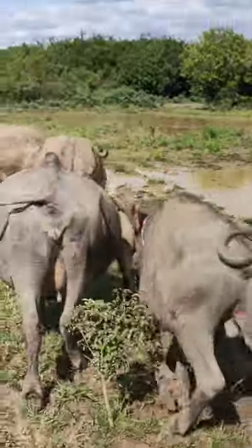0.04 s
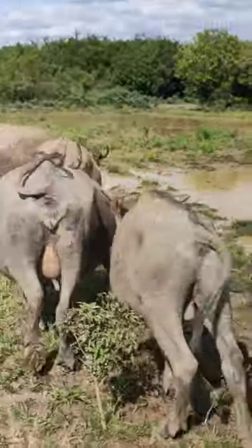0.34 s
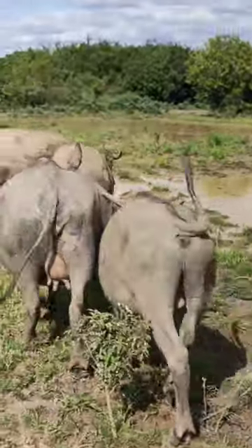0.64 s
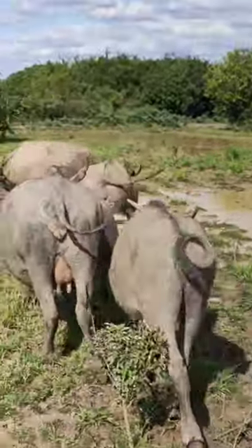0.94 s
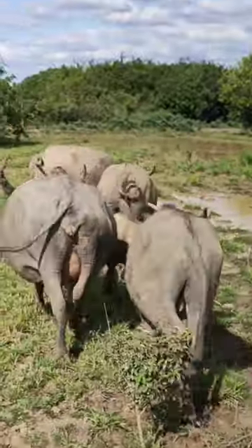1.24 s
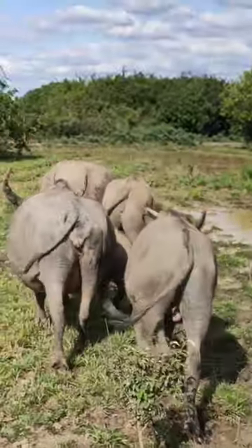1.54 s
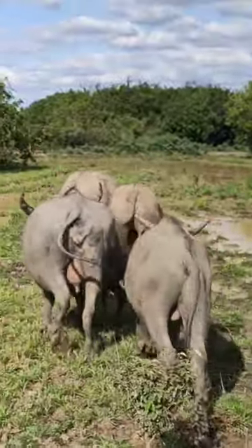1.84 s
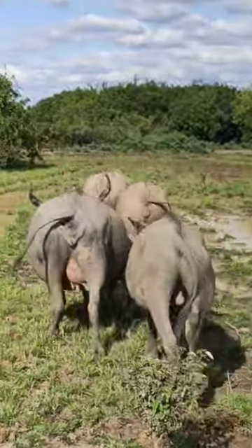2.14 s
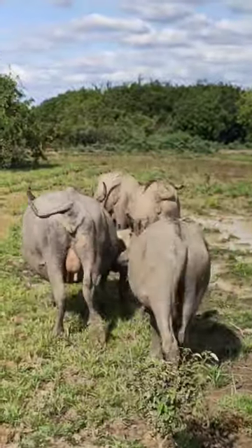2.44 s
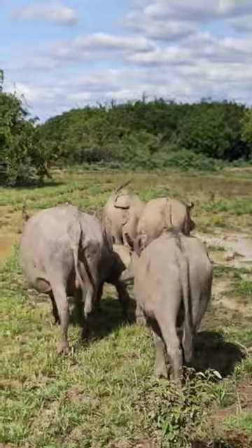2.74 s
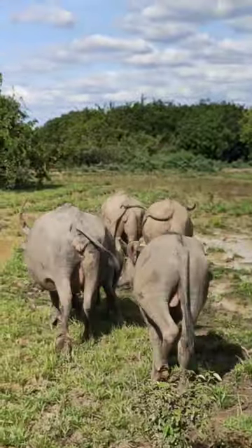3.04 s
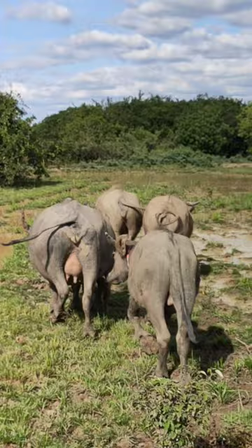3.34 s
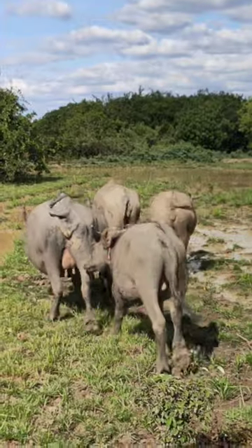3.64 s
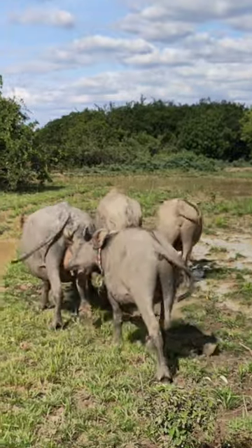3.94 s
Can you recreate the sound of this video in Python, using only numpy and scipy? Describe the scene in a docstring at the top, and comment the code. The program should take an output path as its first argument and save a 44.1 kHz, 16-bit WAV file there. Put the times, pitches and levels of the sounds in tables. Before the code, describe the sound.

Water buffalo walk away over wet grass, their hooves squelching and thudding softly. A twig cracks close on the right, then stalks snap and grass rustles. Light wind rumbles on the microphone, gusting near the end, over faint wetland hiss.

```python
"""Hooves squelch in mud and a dry twig cracks, close by on the right: a few water buffalo are walking
away over wet grass, snapping stalks and brushing the tufts with their legs.
A light wind rumbles on the two microphone ports and gusts near the end; the right port rings in the
treble and, faintly, near 970 Hz. Behind lie the soft hiss of the open wetland and one thin bird chirp."""
import sys
import numpy as np
from scipy import signal
from scipy.io import wavfile
from scipy.ndimage import uniform_filter1d

SR = 44100
rng = np.random.default_rng(int(sys.argv[2]) if len(sys.argv) > 2 else 0)


def unload_wav(signal):
    """Save mono or channel-first audio to the path in sys.argv[1] as 16-bit WAV at rate SR, clipped to [-1, 1]."""
    wavfile.write(
        sys.argv[1],
        SR,
        np.round(np.clip(np.atleast_2d(signal).T, -1, 1) * 32767).astype(np.int16),
    )


N = 176400
TIME = np.arange(N) / SR


def hooves():
    """Tiny wet pops in the hollow under each hoof, dull thuds on turf, and the herd's patter beyond."""
    # Hooves press into and pull out of mud. Each row: peak in seconds, level in dB, fade in seconds,
    # pitch in Hz.
    squelches = [(0.018, -66, 0.072, 1090), (0.03, -70, 0.044, 1800), (0.182, -62, 0.0098, 1950),
                 (0.204, -52, 0.013, 1420), (0.259, -60.5, 0.013, 1450), (0.323, -59.5, 0.0065, 1800),
                 (0.645, -63, 0.028, 1270), (0.838, -62, 0.018, 1030), (0.892, -57, 0.018, 1080),
                 (0.899, -49.5, 0.0069, 1800), (1.603, -57, 0.0064, 1440), (1.81, -68.5, 0.08, 1440),
                 (1.964, -61.5, 0.012, 1360), (2.325, -60, 0.0078, 1380), (2.571, -61, 0.0042, 1720),
                 (2.91, -62.5, 0.0063, 2670), (2.927, -72, 0.0082, 1950), (3.013, -64, 0.0078, 1880),
                 (3.295, -53, 0.0024, 1320), (3.316, -53.5, 0.0082, 1760), (3.469, -56, 0.005, 1300),
                 (3.547, -53.5, 0.0092, 1150), (3.63, -49.5, 0.0036, 2200), (3.745, -62, 0.018, 1770),
                 (3.906, -59.5, 0.011, 1950)]
    # Weight lands on turf. Each row: peak in seconds, level in dB, fade in seconds, pitch in Hz.
    thuds = [(0.012, -60, 0.04, 636), (0.332, -57.5, 0.0052, 483), (0.703, -63, 0.014, 710),
             (0.765, -64.5, 0.053, 650), (0.818, -51.5, 0.0094, 445), (0.836, -58, 0.016, 700),
             (0.905, -64, 0.019, 580), (1.219, -62.5, .006, 400), (3.596, -56, 0.021, 560),
             (3.635, -51.5, 0.0054, 1150), (3.623, -48.5, 0.0095, 209)]
    # Hollows under the farther hooves. Each entry: pitch in Hz.
    herd_hollows = [778, 1150, 1490, 1950]
    herd_db, herd_swing_db, hollow_ratio = -85.5, 5.5, 1.35
    pops = grains(1100, spread_db=3, alike=0.65)
    spray = from_db(-3) * rms_one(band(pops, 600, 3200))
    out = np.zeros((2, N))
    for hz in herd_hollows:
        patter = rms_one(band(pops, hz / 1.154, hz * 1.08))
        out += from_db(herd_db + herd_swing_db * drift(7.9)) * patter
    for s, db, fade, hz in squelches:
        near = around(s)
        hollow = rms_one(band(pops[:, near], hz / hollow_ratio, hz * hollow_ratio))
        out[:, near] += from_db(db) * burst(hollow + spray[:, near], swell(s, fade, near))
    for s, db, fade, hz in thuds:
        near = around(s)
        turf = band(pops[:, near], hz / 2.16, hz * 1.78)
        out[:, near] += from_db(db) * burst(turf, swell(s, fade, near))
    return out * pan(-4)


def twig():
    """A dry twig breaks underfoot, hard right, in two clean, full-bodied clicks."""
    # The wood gives way. Each row: start in seconds, level in dB before filtering.
    cracks = [(0.1523, -16), (0.1563, -21)]
    low_hz, high_hz = 260, 5900
    clicks = np.zeros(N)
    for s, db in cracks:
        clicks[int(s * SR)] = from_db(db)
    wood = band(clicks, low_hz, high_hz)
    return band(wood, low_hz / 2, high_hz) * pan(-32)


def stalks():
    """Each snap is a sharp crack followed by a dying tear of fibres; thicker stalks reach lower."""
    # Stalks break; the low-edged row near 0.82 s is a wet crackle in the mud. Each row: start in seconds, level
    # in dB before filtering, decay in seconds, # low edge in Hz, left over right in dB.
    snaps = [(0.021, -51, 0.0035, 2000, -11), (0.174, -53, 0.0032, 2000, -15),
             (0.326, -57, 0.0065, 2500, -15), (0.819, -50, 0.0028, 600, -11),
             (0.852, -50, 0.0026, 3500, -18), (0.8968, -41.5, .003, 1290, -21),
             (0.903, -45.5, 0.0065, 4000, -28), (0.908, -47, 0.002, 1500, -21),
             (1.2639, -40.5, 0.0058, 2420, -11), (1.549, -45.5, 0.0076, 4720, -20),
             (1.563, -48, 0.0071, 4630, -19), (1.585, -49.5, 0.005, 4330, -18),
             (1.933, -44.5, 0.0047, 3500, -20), (2.325, -50, 0.0046, 1200, -6),
             (2.569, -47.5, 0.0062, 2000, -7), (2.784, -49, 0.0018, 3000, -14),
             (2.893, -44.5, 0.0065, 2800, -19), (2.959, -51.5, 0.0023, 3000, -16),
             (3.317, -44.5, 0.0067, 1700, -14), (3.628, -40.5, 0.0015, 1300, -4),
             (3.65, -47, 0.0023, 4000, -14), (3.6652, -39.5, 0.0018, 4830, -22),
             (3.75, -49.5, 0.004, 3500, -14)]
    high_hz, crack_strength, sizzle_db = 6700, 1.3, -24
    lowpass = signal.butter(6, high_hz, fs=SR, output="sos")
    fibres = grains(9200, spread_db=5.5, alike=1.0)
    age = np.arange(SR // 10) / SR
    out = np.zeros((2, N))
    for s, db, decay, low_hz, side_db in snaps:
        near = slice(int(s * SR), int(s * SR) + len(age))
        tear = burst(fibres[:, near], np.exp(-np.minimum(age / decay, 40)))
        snap = tear + crack_strength * (age == 0)
        body = signal.sosfilt(lowpass, band(snap, low_hz, 2 * high_hz))
        out[:, near] += from_db(db) * pan(side_db) * (body + from_db(sizzle_db) * snap)
    return out


def grass():
    """Blades flick past the legs on the right: fine bright grains in swishes over a light rustle."""
    # Legs brush tufts. Each row: peak in seconds, level in dB, fade in seconds, tilt in dB per octave.
    swishes = [(0.063, -58.5, 0.012, -4.5), (0.331, -57.5, 0.013, -2.5), (0.595, -58, 0.015, -1),
               (0.666, -64, 0.068, 2), (0.854, -63, 0.077, -5), (1.039, -62, 0.021, -1),
               (1.172, -60, 0.0076, -6), (1.282, -67, 0.084, 5), (1.566, -61.5, 0.032, 10),
               (1.855, -62, 0.039, 3), (1.98, -65.5, 0.15, 3.5), (2.395, -59.5, 0.024, -1.5),
               (2.483, -61, 0.028, -5), (2.596, -58.5, 0.015, -2.5), (2.884, -70, 0.077, 11),
               (3.215, -67.5, 0.066, 4.5), (3.311, -62, 0.025, -1), (3.534, -58.5, 0.023, -6.5),
               (3.634, -63, 0.047, -0.5), (3.689, -59, 0.021, -5.5), (3.889, -60.5, 0.0046, -6.5)]
    # The colour of the blades. Each row: frequency in Hz, relative spectral density in dB.
    spectrum = [(1500, -4), (3000, -7), (5000, 2.5), (6300, -5.5), (8000, -3), (11000, -14.5), (14000, 5.5),
                (16000, -20.5)]
    rustle_db, rustle_swing_db = -73, 2
    flicks = [grains(2400, spread_db=2.5, alike=.3) for _ in range(2)]
    edges = np.geomspace(1400, 17000, 11)
    hz = np.sqrt(edges[1:] * edges[:-1])
    colour = from_db(at_hz(spectrum, hz)) ** 2 * np.diff(edges)
    rustle = from_db(rustle_db + rustle_swing_db * drift(2.4))
    power = np.outer(colour / colour.sum(), rustle ** 2)
    for s, db, fade, tilt_db in swishes:
        near = around(s)
        tilted = colour * from_db(tilt_db * np.log2(hz)) ** 2
        swish = from_db(db) * swell(s, fade, near)
        power[:, near] += np.outer(tilted / tilted.sum(), swish ** 2)
    out = np.zeros((2, N))
    for k, band_power in enumerate(power):
        out += np.sqrt(band_power) * rms_one(band(flicks[k % 2], edges[k], edges[k + 1]))
    return out * pan(-21.5)


def wind():
    """A light wind reaches the two microphone ports, each with its own gusts."""
    # Rumble on the left and on the right port. Each row: time in seconds, level in dB.
    left_gusts = [(0, -49.5), (0.38, -41), (0.6, -46), (0.85, -47), (1.05, -41.5), (1.33, -50.5),
                  (1.72, -49), (1.92, -43), (2.32, -45), (2.5, -36), (2.75, -37), (2.85, -33), (2.97, -37),
                  (3.15, -33.5), (3.35, -29.5), (3.5, -39), (3.8, -46), (4.0, -45)]
    right_gusts = [(0.08, -59), (0.68, -55), (0.8, -52), (1.0, -56.5), (1.7, -55), (1.83, -46), (2.0, -55),
                   (2.15, -40.5), (2.48, -39.5), (2.63, -57), (2.75, -62), (2.88, -48), (3.0, -48),
                   (3.3, -29), (3.44, -39), (3.6, -44), (3.72, -52), (3.87, -44), (4.0, -57)]
    return np.array([wind_on_port(left_gusts), wind_on_port(right_gusts)])


def wind_on_port(gusts):
    """Lumpy turbulence on one port, growing brighter as a gust rises above the breeze."""
    # Rumble in a light breeze. Each row: frequency in Hz, relative spectral density in dB.
    spectrum = [(22, -2), (40, 2), (60, 6), (85, 7.5), (120, -7.5), (160, -13), (250, -39), (320, -50),
                (450, -63), (800, -56.5)]
    breeze_db, flutter_db, lumps_db = -44, 2.4, 3.2
    brightening = .55  # dB per octave for each dB above the breeze
    level_db = in_time(gusts)[0] + flutter_db * drift(20.0)
    tilt_db = brightening * np.maximum(level_db - breeze_db, 0)
    white = rng.standard_normal((2, N))
    edges = 20 * 2 ** np.arange(0, 5.6, .5)
    rumble, power = 0, 0
    for k, (low, high) in enumerate(zip(edges, edges[1:])):
        hz = np.sqrt(low * high)
        octaves = np.clip(np.log2(hz / 70), -1, 2.3)
        gain = from_db(at_hz(spectrum, hz) + tilt_db * octaves + 1.8 * drift(23.0)) * np.sqrt(high - low)
        rumble += gain * rms_one(band(white[k % 2], low, high))
        power += gain ** 2
    lumpy = rumble / np.sqrt(power) * from_db(lumps_db * drift(26.7))
    running_rms = np.sqrt(uniform_filter1d(lumpy ** 2, size=SR // 10) + 1e-6)
    return from_db(level_db) * lumpy / running_rms


def eddies():
    """Single eddies strike the ports: short low buffets on top of the rumble."""
    # Eddies hit. Each row: peak in seconds, level in dB, pitch in Hz, left over right in dB.
    buffets = [(0.01, -32.5, 70.5, -14), (0.213, -31.5, 65, 31), (0.357, -34.5, 97, 29),
               (0.557, -39.5, 151, 24), (1.404, -33.5, 90, -15), (1.57, -37.5, 87, 19),
               (1.957, -38.5, 140, 27), (2.072, -35, 166, 20), (2.227, -35, 153, -15),
               (2.319, -32, 134, -16), (2.456, -38, 146, 13), (2.598, -32, 280, 32), (2.627, -33, 197, 30),
               (2.646, -31.5, 313, 36), (2.661, -36.5, 281, 32), (2.677, -36, 255, 35),
               (2.727, -37.5, 246, 34), (2.807, -32.5, 187, 35), (2.841, -28.5, 200, 20),
               (2.856, -38.5, 242, 30), (2.873, -31, 260, 31), (2.888, -25, 209, 32), (2.893, -34, 250, 31),
               (3.085, -36, 222, 28), (3.131, -33.5, 237, 30), (3.186, -31.5, 218, 18),
               (3.209, -30.5, 185, 7), (3.252, -29, 187, -23), (3.304, -29, 232, -4),
               (3.36, -21.5, 160, 29), (3.381, -26, 382, 40), (3.396, -33, 274, 30)]
    fade_s, below, above = 0.0057, 1.87, 1.013  # the band reaches well below the pitch, barely above
    white = rng.standard_normal((2, N))
    out = np.zeros((2, N))
    for s, db, hz, side_db in buffets:
        near = around(s)
        noise = band(white[:, near], hz / below, hz * above)
        dark = band(noise, hz / below ** 2, hz * above * 1.75)  # steepens the skirts
        envelope = swell(s, fade_s, near)
        out[:, near] += from_db(db) * pan(side_db) * [burst(port, envelope) for port in dark]
    return out


def bird():
    """One thin, slightly rough rising whistle, off to the right."""
    # The chirp's path. Each row: time in seconds, pitch in Hz, level in dB.
    chirp = [(1.2, 3750, -78), (1.255, 5000, -68), (1.305, 5600, -64.5), (1.32, 5900, -69),
             (1.345, 6500, -66), (1.365, 6750, -80)]
    waver_hz = 95
    hz, db = in_time(chirp)
    sounding = (TIME > chirp[0][0]) & (TIME < chirp[-1][0])
    phase = 2 * np.pi * np.cumsum(hz + waver_hz * drift(176)) / SR
    return from_db(db) * sounding * np.sin(phase) * pan(-18)


def port_tone():
    """A faint, narrow ring near 970 Hz at the right microphone port, swelling twice near the end."""
    # The ring's rise and fall. Each row: time in seconds, level in dB.
    levels = [(0, -81.5), (2.9, -82.5), (3.03, -69), (3.2, -84), (3.55, -71), (4, -77)]
    hz, width_hz = 969, 24
    tone = rms_one(band(rng.standard_normal(N), hz - width_hz / 2, hz + width_hz / 2))
    return tone * from_db(in_time(levels)[0]) * pan(-29)


def wetland(patchy_db):
    """Smooth far hiss of open ground, most alike at both ports in the low mids, diffuse in the treble."""
    # The colour of the hiss. Each row: frequency in Hz, relative spectral density in dB.
    spectrum = [(150, 22), (400, 3.5), (900, 7.5), (1500, 6), (3000, 4), (4500, 2), (6500, 0), (9000, -5.5),
                (12000, -7), (15500, -3)]
    # How much the ports share. Each row: frequency in Hz, correlation of left and right.
    likeness = [(150, 0.077), (600, 0.63), (1400, 0.2), (3000, 0.059), (7000, 0.026)]
    # Where the hiss leans. Each row: frequency in Hz, left over right in dB.
    balance = [(200, -9.5), (700, 1), (1400, 0.5), (3000, 2.5), (8000, 0), (14000, -3.5)]
    # Its slow rise and fall. Each row: time in seconds, level in dB.
    levels = [(0, -63.5), (.75, -62), (1.45, -64), (2.2, -63.5), (3.1, -63.5), (4, -62.5)]
    white = rng.standard_normal((2, 2, N))
    edges = np.geomspace(140, 17000, 18)
    sides = np.array([[1], [-1]])
    out = np.zeros((2, N))
    for k, (low, high) in enumerate(zip(edges, edges[1:])):
        mid, side = band(white[k % 2], low, high)
        hz = np.sqrt(low * high)
        alike = at_hz(likeness, hz)
        gain = from_db(at_hz(spectrum, hz) + patchy_db * drift(35) + sides * at_hz(balance, hz) / 2)
        out += gain * (np.sqrt(1 + alike) * mid + np.sqrt(1 - alike) * side * sides)
    return rms_one(out) * from_db(in_time(levels)[0])


def port_ring(x, ring_width_hz=940, block=256):
    """A hollow by the right port rings in the treble, sliding upward; steady peaks and dips follow."""
    # The hollow's resonance. Each row: time in seconds, centre in Hz, boost in dB.
    glide = [(0, 4400, 3.5), (.5, 4640, 9), (1.3, 5170, 9.5), (2.2, 5800, 10), (3, 6230, 13),
             (3.9, 6330, 15.5)]
    # The port's steady peaks and dips. Each row: centre in Hz, width in Hz, boost in dB.
    modes = [(990, 150, 3), (1350, 250, -3), (1900, 300, 2.5), (2900, 250, 2), (3500, 500, -2),
             (7500, 1400, -4), (14300, 1800, 2.5)]
    hz, boost_db = in_time(glide)
    ring, state = np.zeros(N), np.zeros(2)
    for i in range(0, N, block):
        b, a = resonance(hz[i], ring_width_hz)
        ring[i:i + block], state = signal.lfilter(b, a, x[i:i + block], zi=state)
    x = x + (from_db(boost_db) - 1) * ring
    for mode_hz, width_hz, db in modes:
        x = x + (from_db(db) - 1) * signal.lfilter(*resonance(mode_hz, width_hz), x)
    return x


def grains(per_s, spread_db, alike):
    """Random tiny clicks of uneven size; alike is the share of their power common to both ports."""
    sizes = from_db(spread_db * np.minimum(rng.exponential(1, N), 4))
    struck = rng.random(N) < per_s / SR
    shared = np.sqrt(alike) * rng.choice([-1, 1], N)
    separate = np.sqrt(1 - alike) * rng.choice([-1, 1], (2, N))
    return rms_one(sizes * struck * (shared + separate))


def swell(s, fade, near, rise_share=0.59):
    """Bell-shaped envelope of a soft contact peaking at s; it swells faster than it fades."""
    age = (TIME[near] - s) / fade
    skewed = np.where(age < 0, age / rise_share, age)
    return np.exp(-.5 * np.minimum(skewed ** 2, 100))


def burst(noise, envelope):
    """Noise under an envelope, scaled to the envelope's own rms."""
    x = noise * envelope
    return x * np.sqrt(np.mean(envelope ** 2) / (np.mean(x ** 2) + 1e-20))


def drift(rate_hz, step=40):
    """Smooth random wander of spread 1."""
    pole = np.exp(-2 * np.pi * rate_hz * step / SR)
    white = rng.standard_normal(N // step + 2002)
    slow = signal.lfilter([1], [1, -2 * pole, pole * pole], white)[2000:]
    return np.interp(np.arange(N) / step, np.arange(len(slow)), rms_one(slow))


def band(x, low_hz, high_hz):
    """Butterworth band-pass."""
    sos = signal.butter(2, [low_hz, min(high_hz, SR * 9 / 20)], "band", fs=SR, output="sos")
    return signal.sosfilt(sos, x + 1e-18)


def resonance(hz, width_hz):
    """Filter coefficients of a resonance with gain 1 on top."""
    r = np.exp(-np.pi * width_hz / SR)
    return np.array([1, 0, -1]) * (1 - r * r) / 2, [1, -2 * r * np.cos(2 * np.pi * hz / SR), r * r]


def around(s):
    """The samples within 0.2 seconds of a contact."""
    return slice(max(int((s - .2) * SR), 0), int((s + .2) * SR))


def in_time(rows):
    """Each column of a curve at every sample."""
    s, *columns = np.transpose(rows)
    return [np.interp(TIME, s, column) for column in columns]


def at_hz(rows, hz):
    """Read a spectrum on a log-frequency axis."""
    row_hz, values = np.transpose(rows)
    return np.interp(np.log(hz), np.log(row_hz), values)


def pan(db):
    """Port gains for left over right in dB; the nearer side keeps full level."""
    return from_db([[min(db, 0)], [min(-db, 0)]])


def from_db(db):
    """Decibels to gain."""
    return 10 ** (np.asarray(db) / 20)


def rms_one(x):
    """Scale to unit rms."""
    return x / np.sqrt(np.mean(x ** 2) + 1e-20)


def scene():
    """Wind and a faint ring at the microphone, the herd to the right, the wetland beyond."""
    buffeting = wind() + eddies()
    herd = hooves() + twig() + stalks() + grass()
    distance = wetland(patchy_db=2.12) + bird()
    return buffeting + herd + distance + port_tone()


def record(dry):
    """The microphone: its right port colours the sound, and both sides lose the very top."""
    cutoff_hz = 15800
    coloured = np.array([dry[0], port_ring(dry[1])])
    return signal.sosfilt(signal.ellip(12, .1, 70, cutoff_hz, fs=SR, output="sos"), coloured)


dry = scene()
out = record(dry)
unload_wav(out)
```